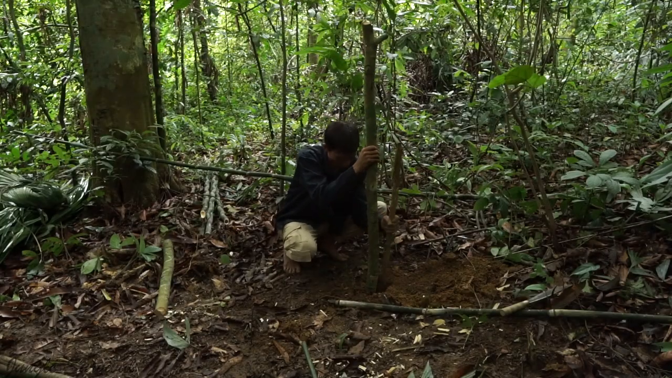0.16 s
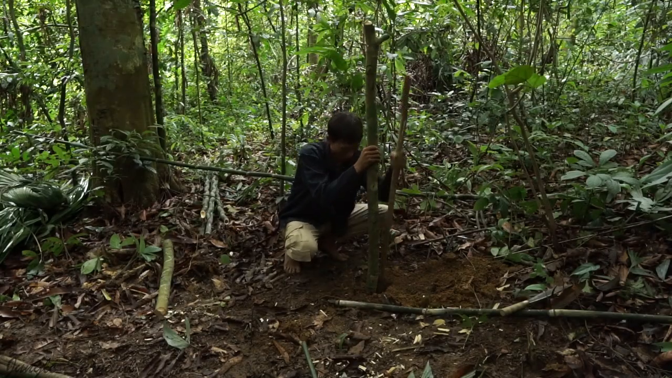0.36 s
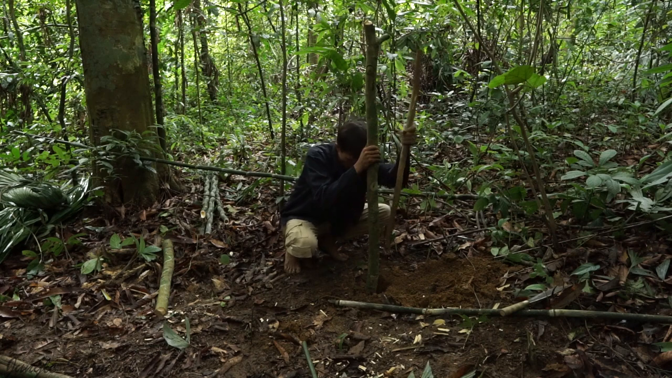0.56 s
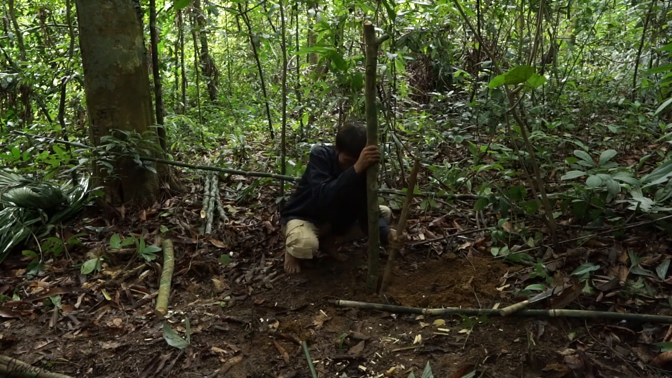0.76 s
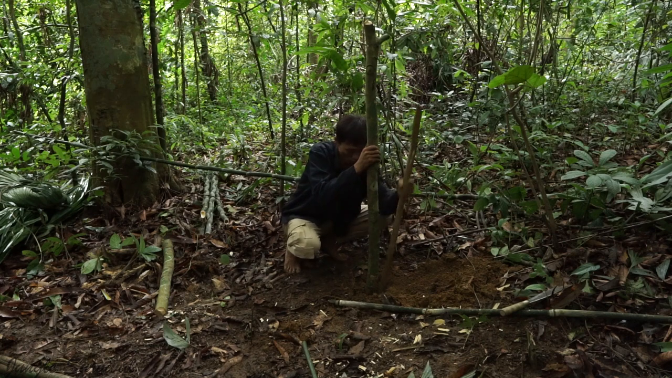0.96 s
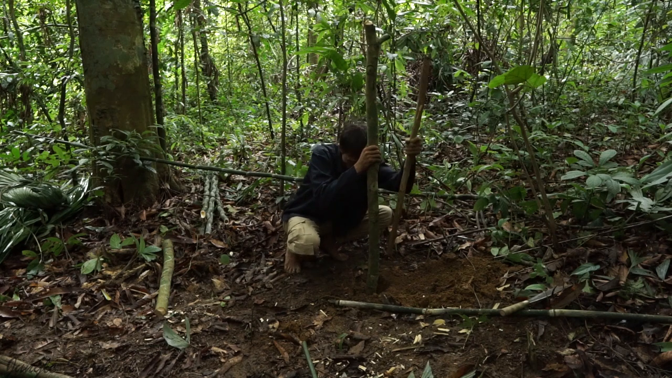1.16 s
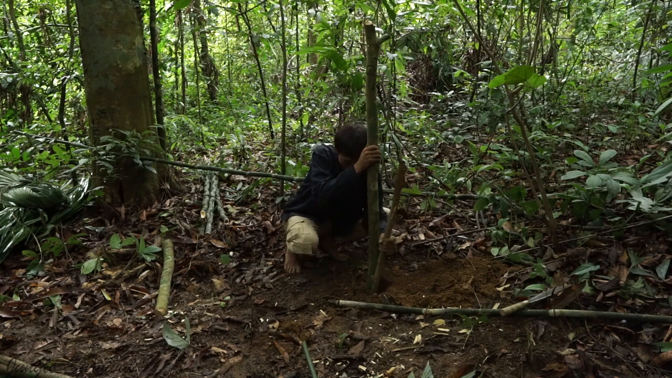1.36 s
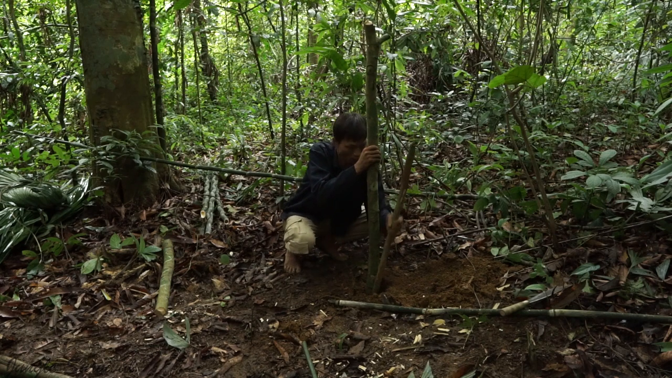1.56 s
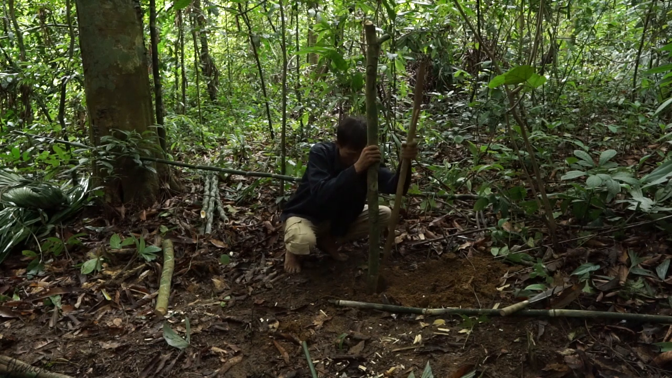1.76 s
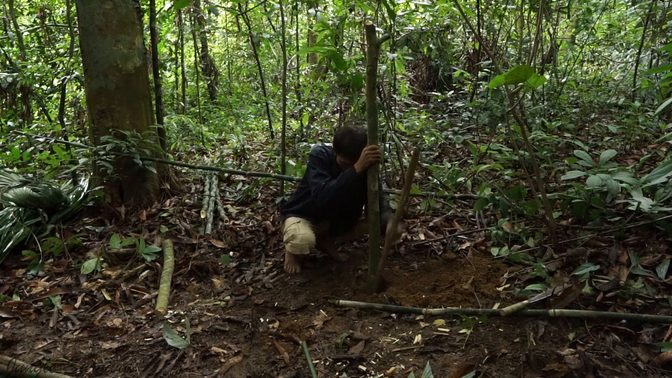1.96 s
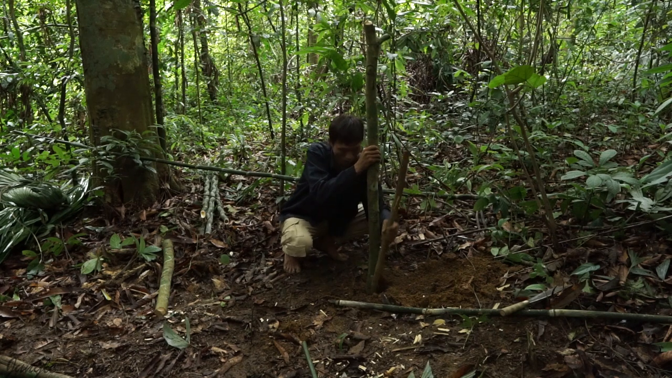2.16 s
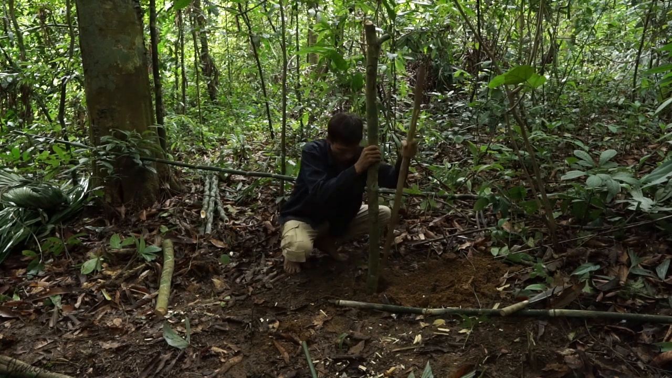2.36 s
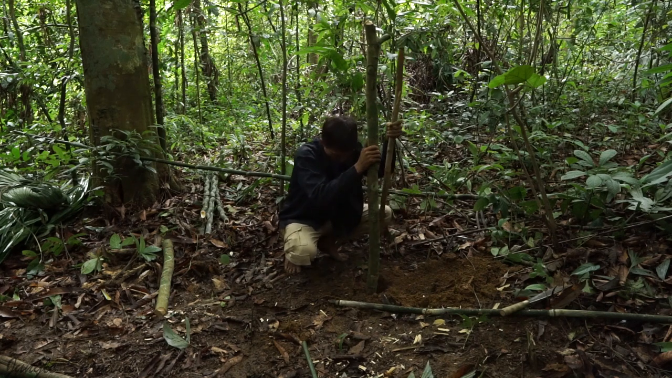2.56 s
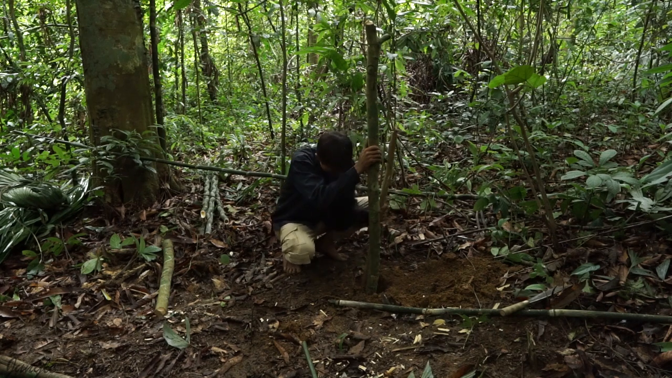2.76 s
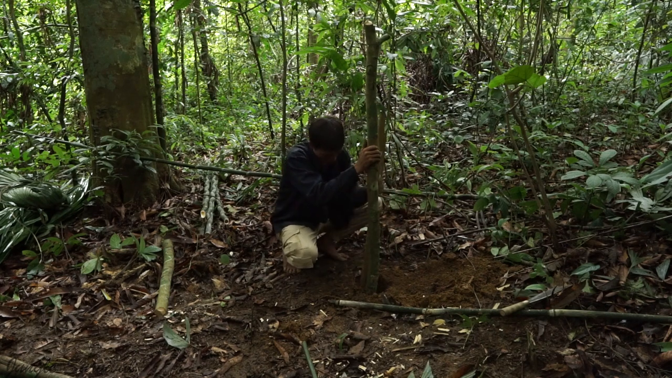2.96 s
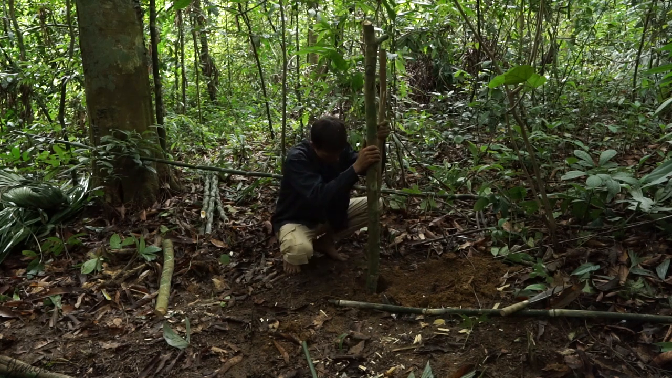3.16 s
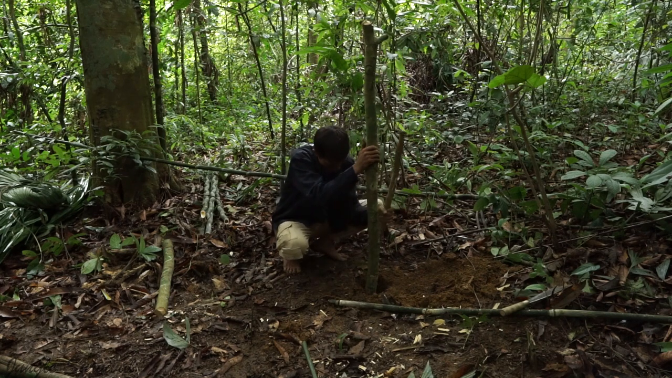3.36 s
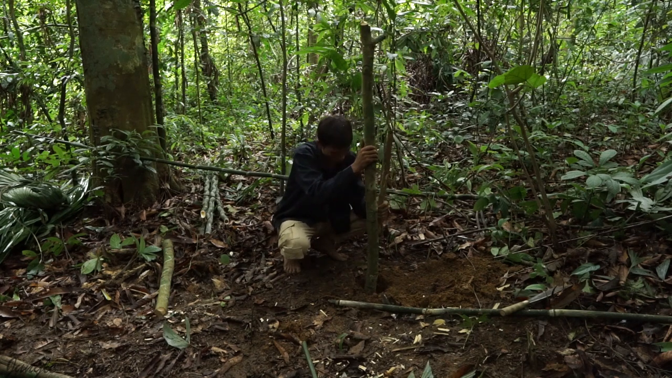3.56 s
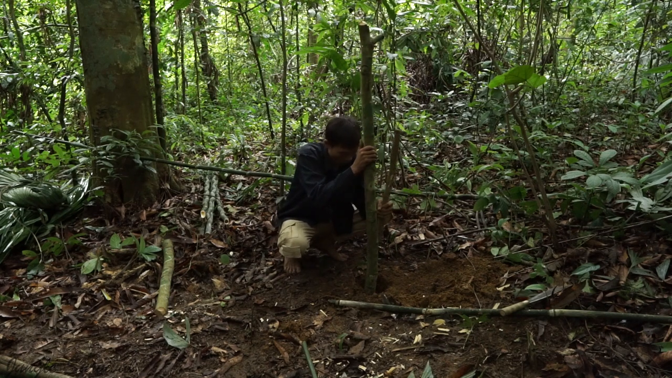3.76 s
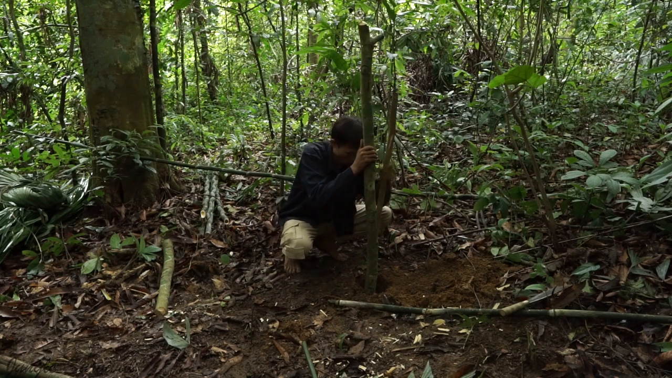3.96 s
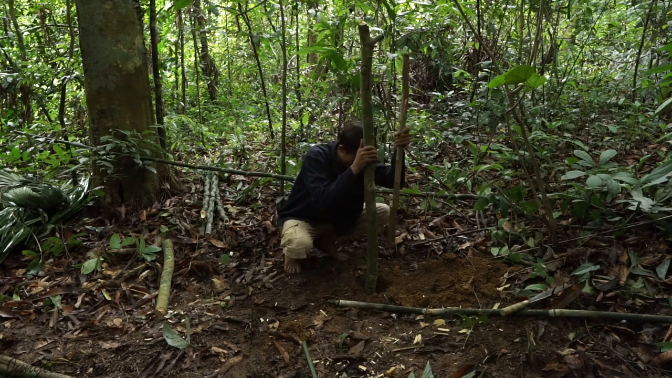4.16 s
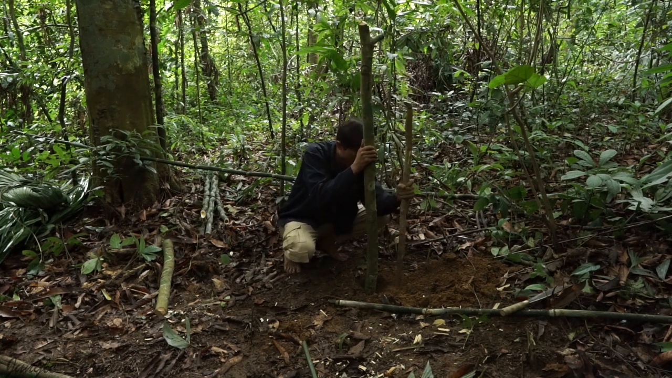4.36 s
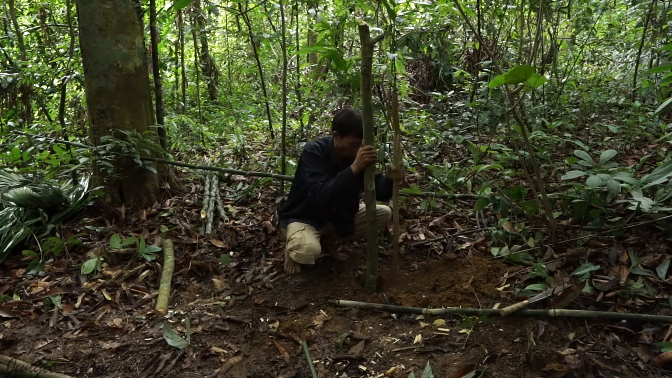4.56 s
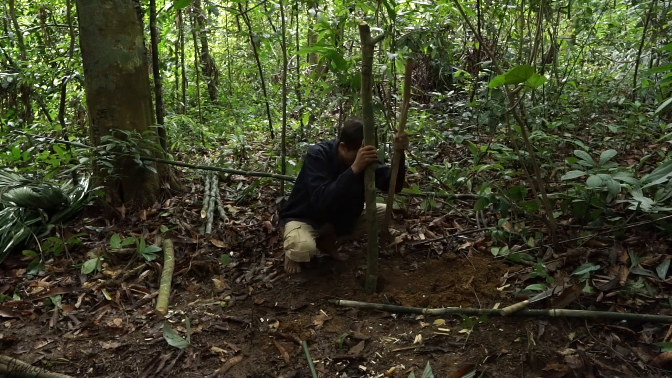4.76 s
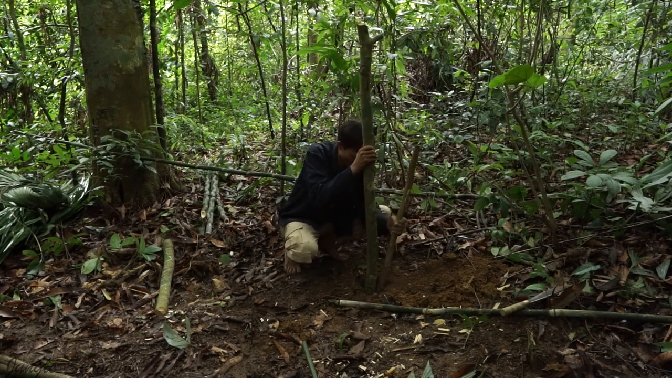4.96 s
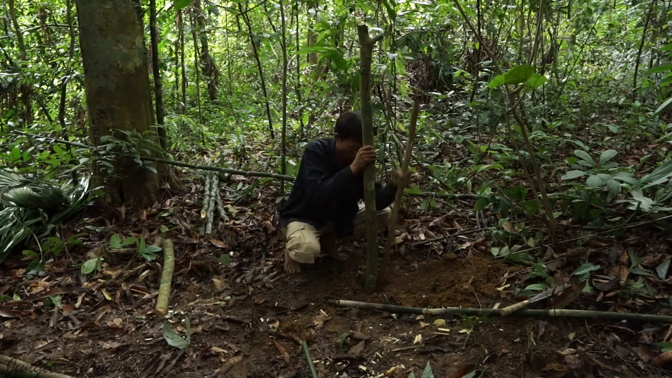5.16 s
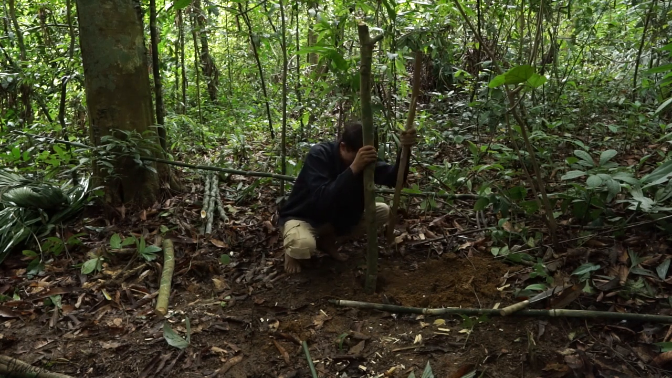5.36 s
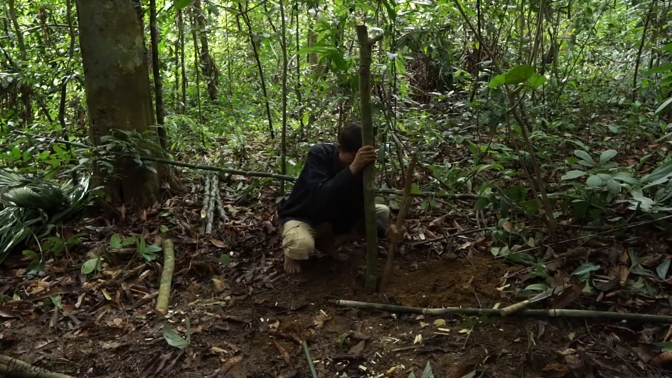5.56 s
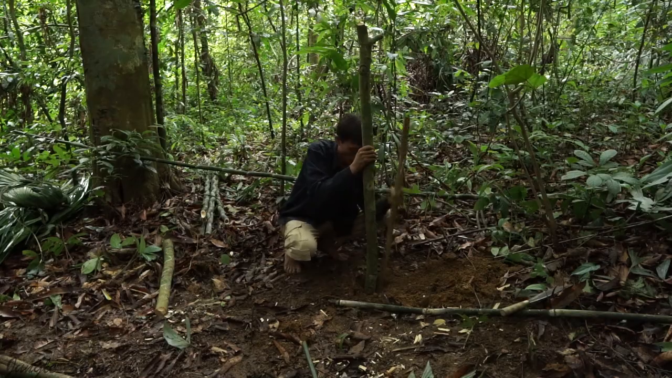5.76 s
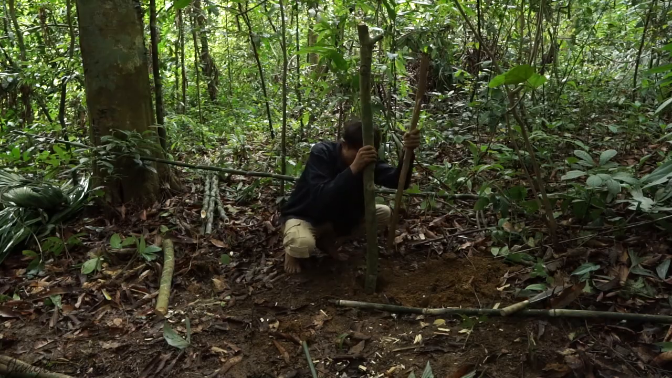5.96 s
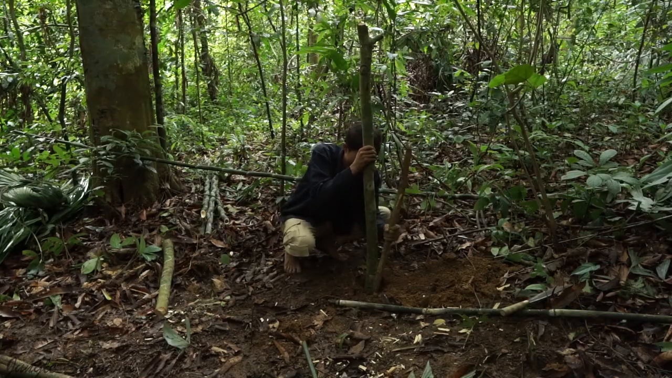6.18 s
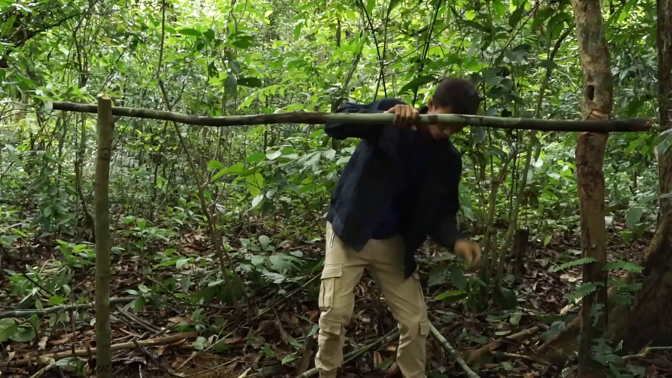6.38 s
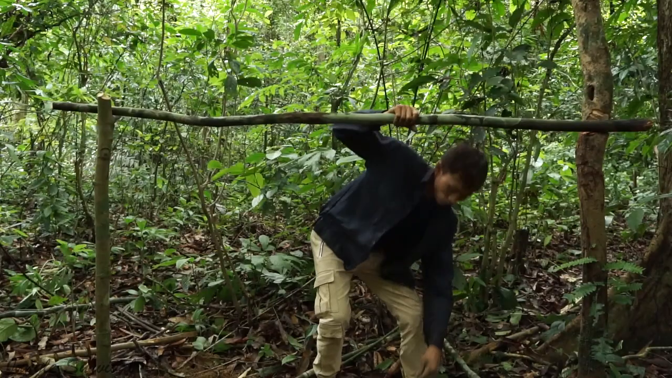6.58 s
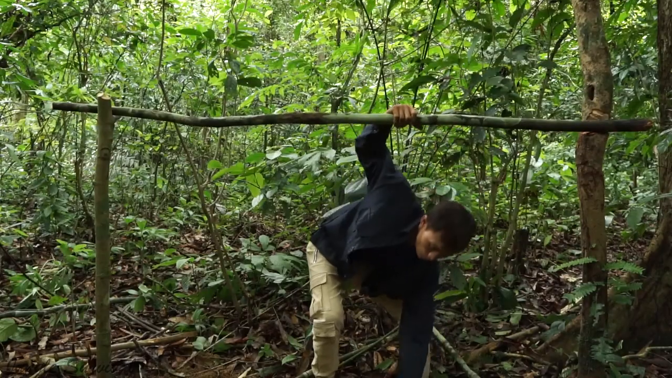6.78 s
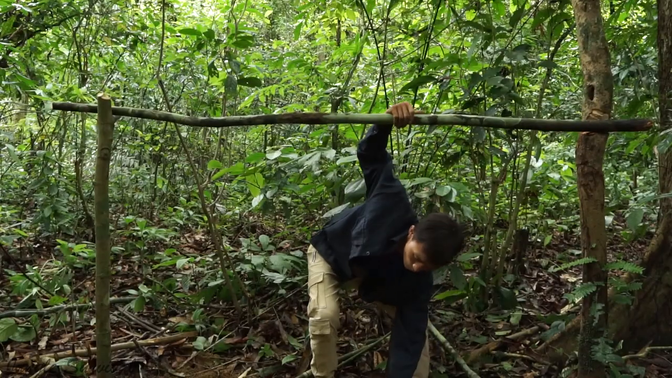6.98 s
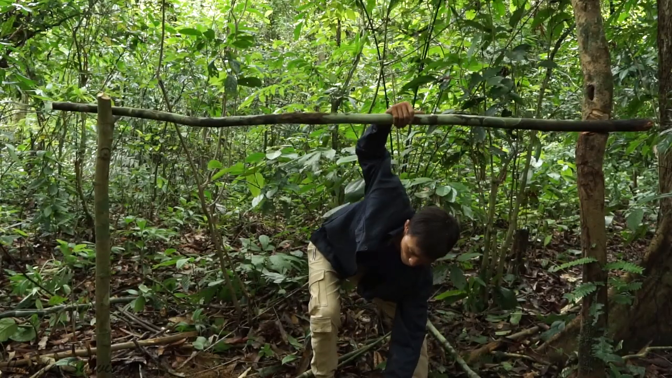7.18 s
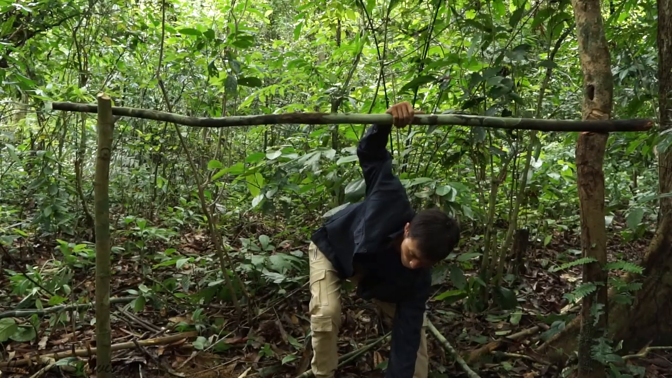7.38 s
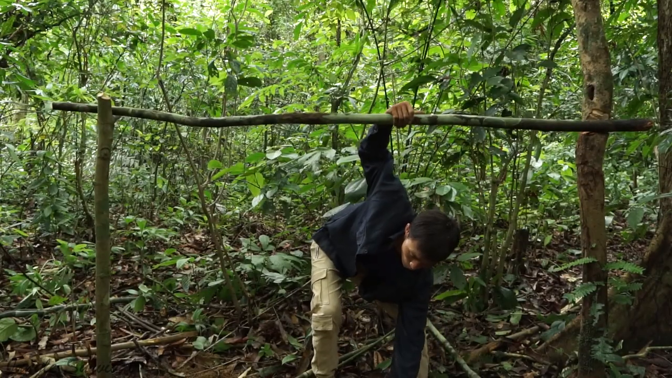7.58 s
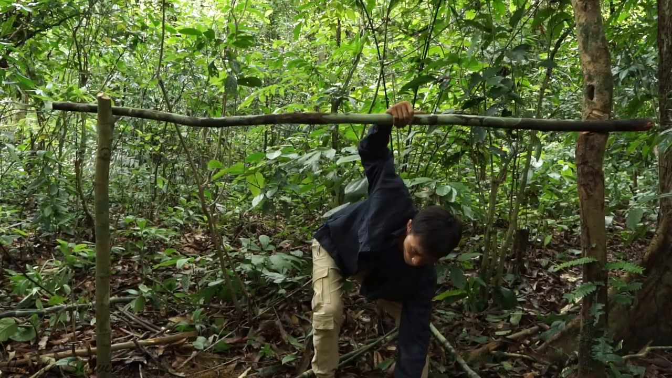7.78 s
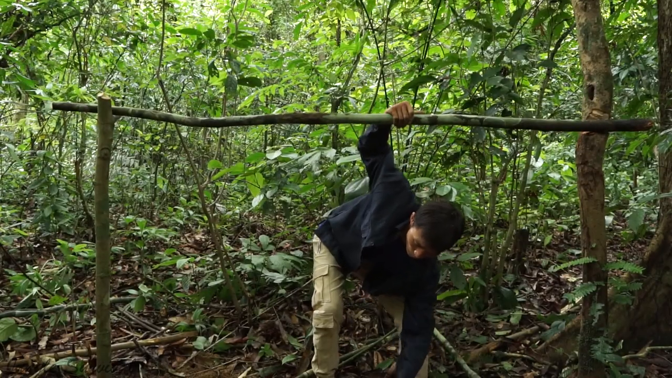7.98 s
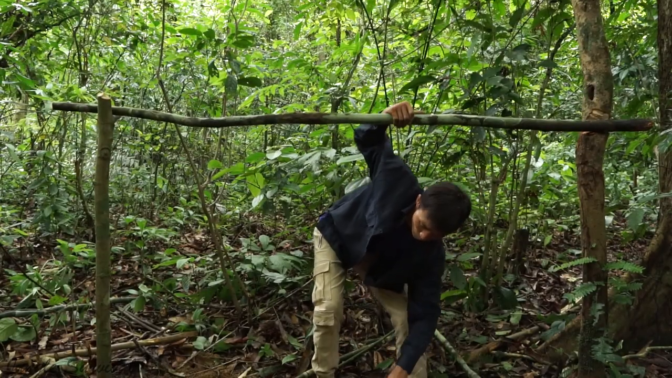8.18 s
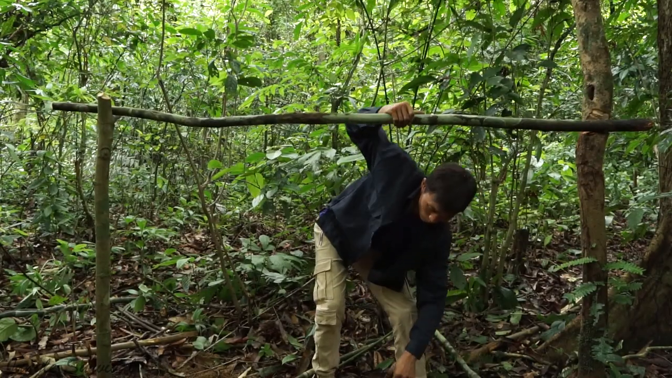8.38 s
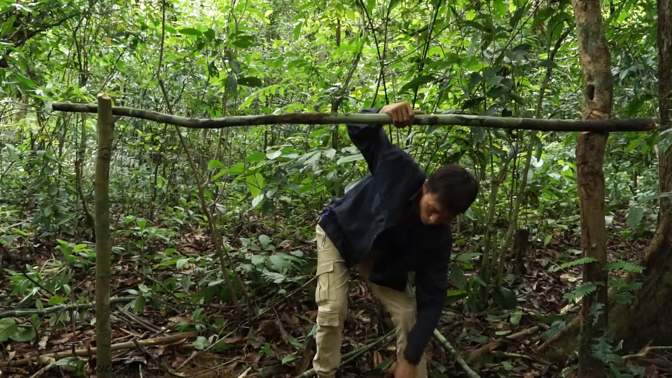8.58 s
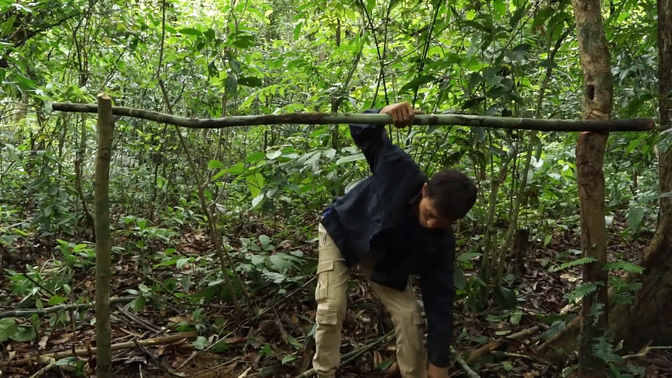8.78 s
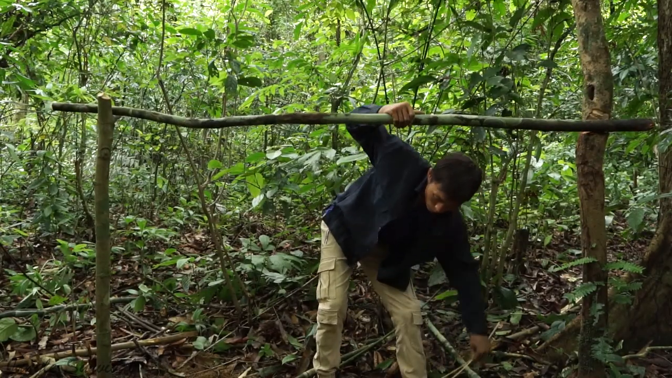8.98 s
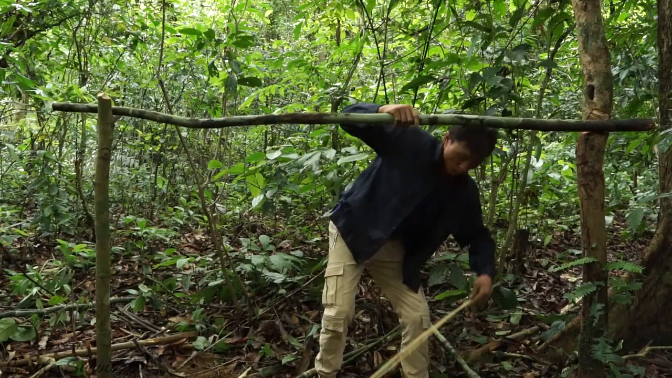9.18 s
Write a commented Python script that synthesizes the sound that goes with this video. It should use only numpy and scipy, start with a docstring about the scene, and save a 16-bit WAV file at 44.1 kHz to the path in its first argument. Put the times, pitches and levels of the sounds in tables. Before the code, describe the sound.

Irregularly loud dry knocks of a stick tamping earth around a bamboo post, then leaf rustle and twig snaps, over steady jungle insect buzz.

```python
"""A forest: two kinds of insects buzz far off over a smooth wash, and the camera adds hum, thin whines and hiss.
Close by, a stick tamps earth around a bamboo post: gritty pushes ring earth, bamboo and grit, and trunks echo.
Some blows sway the camera stand; around the hardest ones, just ahead of the first, the background sinks.
It dips briefly and returns; then, at another spot, a hand drags poles through leaf litter: crackling noise
in broad resonances. Twigs snap in the litter, ringing the same resonances as the blows."""
import sys
import numpy as np
from scipy import signal
from scipy.fft import rfft, irfft, next_fast_len
from scipy.io import wavfile
from scipy.ndimage import uniform_filter1d, map_coordinates

SR = 44100
rng = np.random.default_rng(int(sys.argv[2]) if len(sys.argv) > 2 else 0)


def store_wav(level_fs):
    """Save 16-bit WAV to argv[1]."""
    pcm = np.round(np.clip(np.atleast_2d(level_fs), -1, 1) * 32767)
    wavfile.write(sys.argv[1], SR, pcm.T.astype(np.int16))


N = 407043
SPOT_S = 6.46  # work at the second spot begins


def amp(db):
    """Gain of a level in dB."""
    return 10 ** (np.asarray(db) / 20)


def unit(x):
    """x at rms 1."""
    return x / np.sqrt(np.mean(x ** 2) + 1e-20)


def along(points, hz):
    """Values between (Hz, value) points on a log frequency axis."""
    f, v = np.transpose(points)
    return np.interp(np.log(hz + 1), np.log(f + 1), v)


def curve(points):
    """One value per sample between (s, value) points."""
    s, v = np.transpose(points)
    return np.interp(np.arange(N) / SR, s, v)


def wobble(rate):
    """A smooth random curve, rate knots a second."""
    knots = rng.standard_normal(int(N * rate / SR) + 4)
    return map_coordinates(knots, [np.arange(N) * rate / SR])


def filtered(x, response):
    """x through a complex response of frequency."""
    n = x.shape[-1]
    m = next_fast_len(n + 8192)
    return irfft(rfft(x, m) * response(np.fft.rfftfreq(m, 1 / SR)), m)[..., :n]


def soft(f, hz):
    """A two-pole low-pass: a soft contact passes little far above hz."""
    return hz * hz / (hz * hz - f * f + 1.4j * f * hz)


def modes(table, near_hz=None, reach=0.29):
    """Response of (Hz, width Hz, dB) resonances; where the blow lands favours those close to near_hz."""
    def favour(centre):
        if near_hz is None:
            return 1
        return 0.38 + np.exp(-.5 * (np.log(centre / near_hz) / reach) ** 2)

    def response(f):
        total = 0
        for k, (centre, width, db) in enumerate(table):
            ring = 1j * f * width / (centre * centre - f * f + 1j * f * width)
            total = total + (-1) ** k * favour(centre) * amp(db) * ring  # neighbours in opposite sign
        return total
    return response


def gritty(n, spread_db):
    """Noise whose grains differ widely in size, up to a largest grain."""
    return rng.standard_normal(n) * amp(spread_db * np.minimum(rng.exponential(size=n), 6))


def cicadas():
    """Far, low insects: a narrow, rough song that swells slowly and breaks off, its pitch following its level."""
    # Swells of the song: (time of the peak [s], level [dB], time to gain the last 10 dB [s])
    song_swells = [(0.2, -49, .6), (1.36, -51, 1), (2.5, -50, .65), (3.52, -49.5, .75), (4.52, -49.5, 0.5),
                   (5.5, -52, .6), (6.66, -57, 0.5), (8.1, -55, 0.9)]
    fade_s, rest_db = .22, -61  # time to lose 10 dB; lowest level between swells
    t = np.arange(N) / SR
    levels = []
    for s, db, grow in song_swells:
        drop = np.where(t < s, np.abs((s - t) / grow) ** 3, (t - s) / fade_s)
        levels.append(db - 10 * drop)
    db = np.maximum(np.max(levels, axis=0), rest_db)
    pitch_hz = 3731.0 + 6 * (db + 50.5) + 25 * wobble(6.5)  # climbs 6 Hz per dB and wanders
    rough = unit(filtered(rng.standard_normal((2, N)), lambda f: soft(f, hz=95.3)))
    turn = 2 * np.pi * np.cumsum(pitch_hz) / SR
    return amp(db) * (rough[0] * np.cos(turn) + rough[1] * np.sin(turn))


def crickets():
    """Far, high insects: a chorus blurred into fluttering noise by distance, ringing in one wing resonance."""
    # Chorus ahead of the background gain: (time [s], level [dB])
    chorus_level = [(0, -53), (6.8, -52.5), (7.3, -57), (9.23, -53)]
    wing = modes([(6256, 410, 0)])
    flutter = amp(1.47 * wobble(40))
    buzz = filtered(rng.standard_normal(N) * flutter, lambda f: wing(f) ** 2)
    return amp(curve(chorus_level)) * unit(buzz)


def forest():
    """The far, smooth wash of the forest: shaped noise with a slight, slow drift."""
    # Spectrum of the wash: (frequency [Hz], relative level per Hz [dB])
    wash_spectrum = [(25, 9), (60, 4), (120, -4.5), (300, -3), (1000, -6), (3000, -12.5), (5400, -15),
                     (8000, -16.5), (13000, -19.5), (16000, -19)]
    wash = filtered(rng.standard_normal(N), lambda f: amp(along(wash_spectrum, f)))
    return amp(-45.5 + 0.118 * wobble(2.01)) * unit(wash)


def camera():
    """Hum and whines on multiples of one clock, and hiss in opposite sign on the two channels."""
    # Hum partials ahead of the background gain: (multiple of the clock [1], rms level [dB])
    hum_partials = [(1, -34.5), (2, -54), (3, -54), (5, -62)]
    # Thin whines far up the same series: (multiple of the clock [1], rms level [dB])
    whine_partials = [(193, -76), (194, -72), (195, -74), (257, -82), (258, -71), (259, -70), (260, -75)]
    # Spectrum of the hiss: (frequency [Hz], relative level per Hz [dB])
    hiss_spectrum = [(25, -11), (200, -6), (1000, -12), (2200, -18), (6000, -16), (15000, -13.5),
                     (16000, -10)]
    clock_hz = 50
    t = np.arange(N) / SR
    hum = np.zeros(N)
    for k, db in hum_partials + whine_partials:
        phase = 2 * np.pi * (clock_hz * round(k) * t + rng.random())
        hum += np.sqrt(2) * amp(db) * np.sin(phase)
    hiss = unit(filtered(rng.standard_normal(N), lambda f: amp(along(hiss_spectrum, f))))
    return hum + amp(-51.5) * np.outer([1, -1], hiss)


def contacts(events, offset_db, spread_db, blow, bounce):
    """Each contact is a gritty, dying push into four groups of resonances, each dying at its own pace."""
    # Packed earth: (frequency [Hz], width [Hz], gain [dB])
    earth_modes = [(126.1, 27.3, 1.5), (173, 64, 1.5), (310, 270, -2)]
    # Low bamboo: (frequency [Hz], width [Hz], gain [dB])
    knock_modes = [(420, 130, 0), (515, 130, 1), (630, 120, 0), (755, 110, 1), (900, 150, 0),
                   (1100, 170, 0), (1320, 200, -1)]
    # High bamboo: (frequency [Hz], width [Hz], gain [dB])
    clack_modes = [(1580, 260, 0), (1850, 260, 0), (2180, 300, -1), (2500, 320, -1), (3050, 480, 1),
                   (3700, 550, -1)]
    # Dry grit: (frequency [Hz], width [Hz], gain [dB])
    grit_modes = [(4370, 650, 0.5), (5680, 1140, 3), (6300, 2700, 1.5), (8684, 1840, 5.5),
                  (10700, 2800, -0.5)]
    out, t = np.zeros(N + SR), np.arange(SR // 5) / SR
    before, before_db = -1, 0
    for s, knock_db, thud_db, clack_db, grit_db, knock_hz, t60, grit_hz in events:
        # (resonances, level [dB], softness [Hz], pace of dying)
        groups = ((modes(knock_modes, knock_hz), knock_db, 2200, 1.1),
                  (modes(earth_modes), thud_db, 500, 1.3),
                  (modes(clack_modes, 2100, reach=0.34), clack_db, 5000, 1.1),
                  (modes(grit_modes, grit_hz), grit_db, 12000, 1.2))
        fresh = s - before > .025 or knock_db > before_db + 6
        before, before_db = s, knock_db
        # a fresh contact is the sharper the harder it lands
        touch = blow * amp(0.266 * (knock_db + 14.0)) if fresh else bounce
        for body, db, soft_hz, pace in groups:
            decay = amp(-60 * pace * t / np.clip(t60, .004, .2))
            push = unit(gritty(len(t), spread_db)) * decay
            push *= 1 - np.exp(-t / 0.000594)  # the earth gives way
            push[:3] += touch
            ring = filtered(push, lambda f: body(f) * soft(f, soft_hz))
            loudest = np.sqrt(uniform_filter1d(ring ** 2, size=132).max())  # rms over 3 ms
            out[round(s * SR):][:len(t)] += amp(db + offset_db) * ring / loudest
    return out[:N]


def tamping():
    """The stick on earth and bamboo: each stroke is a first touch and its bounces."""
    # Contacts, levels ahead of the offset, t60 ahead of each group's pace:
    # (time [s], knock [dB], thud [dB], clack [dB], grit [dB], favoured knock [Hz], t60 [s])
    stick_blows = [(0.1095, -32, -36, -43.5, -45, 1400, .025), (0.1165, -30, -37, -37, -45, 1400, 0.05),
                   (0.132, -26, -31, -39, -47, 522, 0.05),
                   (0.1589, -30.5, -29.5, -37.5, -44.5, 1210, 0.064),
                   (0.1758, -29, -29, -32, -38, 1040, .045), (0.1827, -17.5, -27, -20, -21.5, 1030, 0.032),
                   (0.7383, -31.5, -43.5, -36.5, -35.5, 885, 0.0343),
                   (0.7456, -35, -38, -39, -35, 540, 0.075), (0.7613, -35.5, -35, -38.5, -46, 400, 0.083),
                   (0.7785, -34, -33.5, -41, -43, 400, 0.094),
                   (1.3573, -17.5, -29.5, -19.5, -22, 1340, 0.0166),
                   (1.3671, -34, -37, -32, -33, 1020, .063), (1.3853, -45, -31.5, -42, -41, 400, .038),
                   (1.3976, -29, -29, -43.5, -42, 477, 0.023), (2.0432, -22.5, -40, -27.5, -29, 800, 0.047),
                   (2.0518, -30, -27, -30, -38.5, 670, .042), (2.0683, -44, -21.5, -38.5, -40, 400, 0.056),
                   (2.8288, -11.5, -32, -22.5, -22.5, 490, 0.016), (2.8348, -16, -21, -24, -29, 680, 0.035),
                   (2.8416, -16.5, -24, -29, -38.5, 710, .032), (2.853, -46, -29, -33, -35, 740, .05),
                   (2.9155, -36, -46.5, -38.5, -49.5, 908, 0.057), (3.3826, -25, -33, -29, -39, 527, 0.091),
                   (3.3916, -32.5, -38.5, -36, -34.5, 556, .092),
                   (3.4108, -28, -27, -31, -34.5, 950, 0.038), (3.4194, -29.5, -31, -30, -33.5, 400, 0.073),
                   (3.9713, -37.5, -37.5, -47.5, -47, 400, 0.072),
                   (4.1189, -43, -47, -48.5, -47, 1000, .045), (4.3476, -18, -22, -19.5, -16, 400, 0.0245),
                   (4.3515, -15.5, -15.5, -15.5, -34.5, 980, 0.015),
                   (4.3597, -48, -41, -28, -28.5, 980, .11), (4.9374, -17, -33.5, -22, -34, 1400, 0.033),
                   (4.9432, -9, -28, -11, -20, 494, 0.026), (4.9536, -13.5, -28, -26.5, -21.5, 1100, 0.027),
                   (4.9652, -14.5, -23.5, -28, -34.5, 490, 0.0235),
                   (5.5698, -7, -15, -19, -28.5, 440, 0.0164), (5.5744, -14, -22, -23, -36, 397, 0.0235),
                   (5.5901, -46, -39, -32, -42.5, 400, 0.053), (5.7887, -40, -43, -44.5, -53, 1000, 0.066),
                   (6.0125, -43.5, -38, -61, -53, 470, 0.044), (6.1125, -52, -42, -56, -55, 400, 0.036),
                   (6.1879, -30, -41, -23, -37, 980, 0.034), (6.2007, -29, -29, -29, -35.5, 517, .033),
                   (6.2131, -36, -34, -40, -41, 510, 0.084)]
    grit_hz = 5070
    rows = [(*row, grit_hz) for row in stick_blows]
    return contacts(rows, offset_db=-1.54, spread_db=3, blow=1.83, bounce=0.84)


def trees(x):
    """Trunks scatter the sound back; each frequency dies at its own speed, a new tail every quarter second."""
    # Dying of the echoes: (frequency [Hz], t60 [s])
    echo_t60 = [(100, 0.13), (1000, 0.25), (2100, 0.58), (3500, 0.51), (10000, 0.37)]
    out, step = np.zeros(N + SR), SR // 4
    for a in range(0, N, step):
        hz, t, z = signal.stft(rng.standard_normal(SR // 2), SR, nperseg=256)
        decay = amp(-60 * t / along(echo_t60, hz)[:, None])
        tail = signal.istft(z * decay, SR, nperseg=256)[1]
        wet = signal.fftconvolve(x[a:a + step], tail / np.linalg.norm(tail))
        out[a + 200:][:len(wet)] += wet  # echoes start 200 samples late
    return out[:N]


def shakes():
    """The ground shakes the camera stand after some blows: a low, soft-starting, dying sine."""
    # Sways of the stand: (time [s], frequency [Hz], level [dB], t60 [s])
    stand_sways = [(2.86, 76, -27, .33), (4.36, 56, -29, .3), (4.385, 77, -27, .4), (5.02, 76, -38, .3)]
    out, t = np.zeros(N + SR), np.arange(SR // 2) / SR
    for s, hz, db, t60 in stand_sways:
        envelope = amp(db - 60 * t / t60) * (1 - np.exp(-t / 0.0235))
        out[round(s * SR):][:len(t)] += envelope * np.sin(2 * np.pi * hz * t)
    return out[:N]


def stirring():
    """Levels (dB) of leaves, crisp and poles: a bed, busier at first, with each sweep of the hand adding power."""
    # Sweeps of the hand; one with no time to swell adds nothing:
    # (time of the peak [s], time to swell by 10 dB [s], leaves [dB], crisp [dB], poles [dB])
    hand_sweeps = [(6.8, 0.17, -50, -58, -50), (7.2, 0.01, -52.5, -55, -51), (7.495, .05, -39.5, -51, -39),
                   (8.3, 0.1149, -35, -42.5, -52), (8.365, 0, -36, -37, -40.5),
                   (8.44, 0.09, -31, -35.5, -38.5), (8.545, .02, -30, -36, -41),
                   (8.66, 0.0141, -31, -28, -40.5), (8.7, 0.02, -34, -32.5, -44.5),
                   (8.872, 0.06, -39, -41, -50.5), (8.945, .03, -29.5, -33, -34),
                   (9.034, 0.04, -36.5, -40, -39.5)]
    linger = 1.3  # a sweep dies this many times slower than it swells
    settle_db, settle_s = 3.5, .6  # extra level at first, per unit of share, and its time constant
    t = np.arange(N) / SR
    steady_db = np.array([[-48.5], [-61], [-42]])
    share = np.array([[1], [2], [0]])
    bed_db = steady_db + settle_db * np.exp(-np.abs(t - SPOT_S) / settle_s) * share
    power = amp(2 * bed_db)
    for s, swell, *peak_db in hand_sweeps:
        drop = np.maximum(s - t, (t - s) / linger) / swell
        power = power + amp(2 * (np.array(peak_db)[:, None] - 10 * drop))
    return 10 * np.log10(power)


def litter():
    """Dragged poles rumble and leaves rustle; the harder the hand stirs, the more grains clump into crackles."""
    leaves_db, crisp_db, poles_db = stirring()
    stir = np.clip((leaves_db + 50) / 13, .15, 1)
    clump, crackle = stir * wobble(45), wobble(220)
    pole_body = modes([(179, 278, 0.0), (497, 761, 3.5), (1050, 1460, -1.0)])
    leaf_body = modes([(2020, 5540, 1.47), (4080, 5040, 3.2)])
    crisp_body = modes([(5800, 1280, -5.0), (7700, 2300, -1.5), (9700, 4600, -7.0)])
    pole_drag = gritty(N, spread_db=1.5) * amp(1.84 * clump)
    leaf_rub = gritty(N, spread_db=3.0) * amp(0.57 * clump + 2.61 * stir * crackle)
    crisp_rub = gritty(N, spread_db=3.5) * amp(1.0 * clump + 1.7 * stir * crackle)
    poles = amp(poles_db) * unit(filtered(pole_drag, pole_body))
    leaves = amp(leaves_db) * unit(filtered(leaf_rub, leaf_body))
    crisp = amp(crisp_db) * unit(filtered(crisp_rub, crisp_body))
    begun = np.clip((np.arange(N) / SR - SPOT_S) / 0.017, 0, 1)
    return begun * (poles + leaves + crisp)


def twigs(count=10):
    """Loud snaps, and small twigs that break by chance, more often the harder the leaves are stirred."""
    # The loudest snaps, levels ahead of the offset:
    # (time [s], knock [dB], clack [dB], grit [dB], favoured knock [Hz], favoured grit [Hz])
    loud_snaps = [(7.1175, -40, -42, -36, 400, 6420), (7.5095, -43.5, -31, -26.5, 400, 5560),
                  (8.2575, -41, -39, -37.5, 540, 4300), (8.3255, -42, -31, -19, 1400, 7800),
                  (8.3425, -36, -31, -21.5, 1040, 5810), (8.4818, -33, -39, -36, 1400, 5180),
                  (8.5295, -19, -17, -21, 757, 7700), (8.6485, -34, -25, -14.5, 400, 8300),
                  (8.6599, -40, -38, -26, 680, 7840), (8.6845, -26, -21, -15.5, 1400, 6510),
                  (8.7758, -40, -38.5, -32, 820, 7090), (8.8535, -40.5, -40, -24.5, 400, 4300),
                  (8.9315, -33, -31, -40.5, 510, 6240), (8.9575, -25.5, -20, -37, 1400, 6420),
                  (8.9955, -40.5, -28.5, -25, 1400, 4960), (9.0195, -37, -36, -28, 1400, 8300),
                  (9.0355, -31, -33, -36.5, 1230, 4300), (9.0955, -47, -34.5, -34, 1040, 6420),
                  (9.2105, -40, -38, -36.5, 400, 8190)]
    tick_db, tick_spread_db = -37.5, 3  # ahead of the offset
    thud_db, t60_s = -55.5, 0.023  # ahead of the offset and of each group's pace
    t = np.arange(N) / SR
    busy = np.cumsum(amp(stirring()[0]) * (np.arange(N) > SPOT_S * SR))
    luck = rng.random((count, 6))
    # equal shares of the stirring hold one tick each
    times = np.interp((np.arange(count) + luck[:, 0]) / count * busy[-1], busy, t)
    ticks = []
    for s, u in zip(times, luck):
        levels = tick_db + tick_spread_db * (2 * u[1:4] - 1)
        ticks.append((s, *levels, 400 + 1000 * u[4], 4300 + 4000 * u[5]))
    rows = [(s, knock, thud_db, clack, grit, knock_hz, t60_s, grit_hz)
            for s, knock, clack, grit, knock_hz, grit_hz in loud_snaps + ticks]
    return contacts(sorted(rows), offset_db=-2.4, spread_db=2.5, blow=7.2, bounce=2.1)


def scene():
    """Near work with its echoes over the far insects, the forest and the camera's own noise."""
    # Gain of all background, with a brief dip just before the second spot: (time [s], gain [dB])
    background_gain = [(0, 2), (4.91, 2), (4.93, -3.5), (5.55, -2.5), (5.58, -4.5), (6, -5.5), (6.447, -4),
                       (6.452, -27.5), (6.458, -14), (6.48, 3.5), (6.55, 2), (9.23, 1.5)]
    dull_hz = 10600  # the microphone loses treble above this
    hits = tamping() + twigs()
    work = hits + amp(-14.0) * trees(hits) + litter()
    near = filtered(work, lambda f: soft(f, dull_hz))
    far = forest() + cicadas() + crickets()
    return near + shakes() + amp(curve(background_gain)) * (far + camera())


def record(dry):
    """The hardest peaks are rounded off; nothing passes above the band limit."""
    top_hz = 15900
    rounded = dry / (1 + np.abs(dry / .99) ** 8) ** (1 / 8)
    return filtered(rounded, lambda hz: hz < top_hz)


dry = scene()
out = record(dry)
store_wav(out)
```